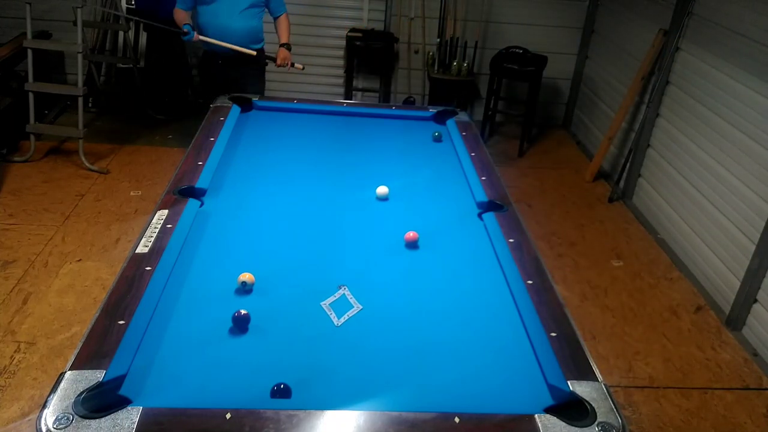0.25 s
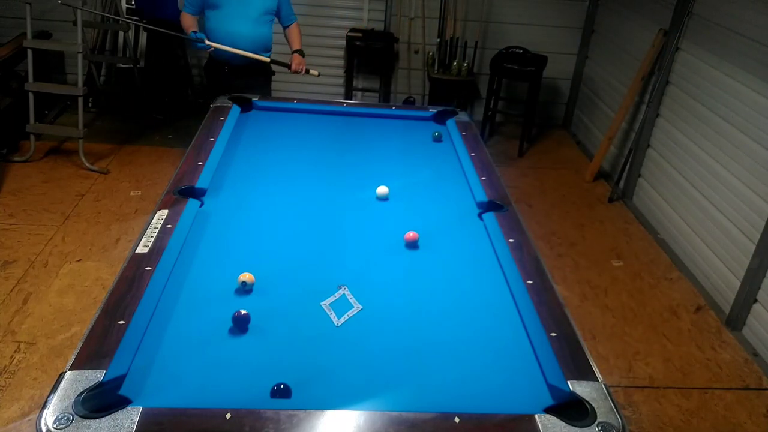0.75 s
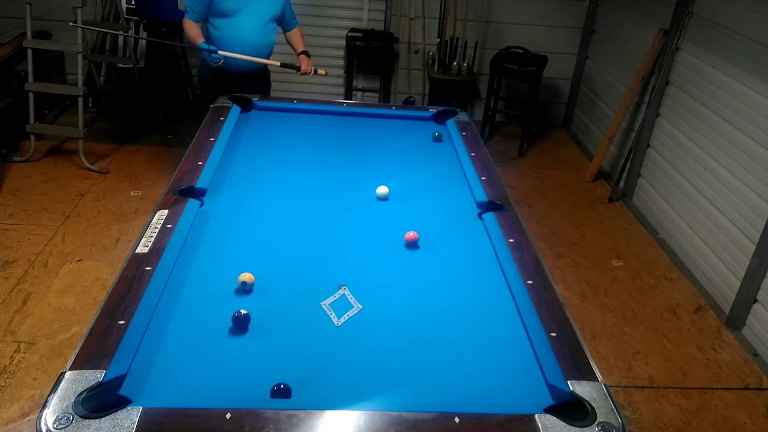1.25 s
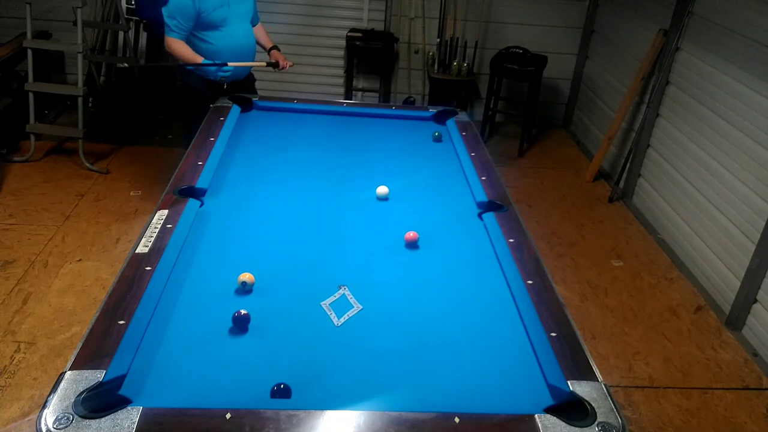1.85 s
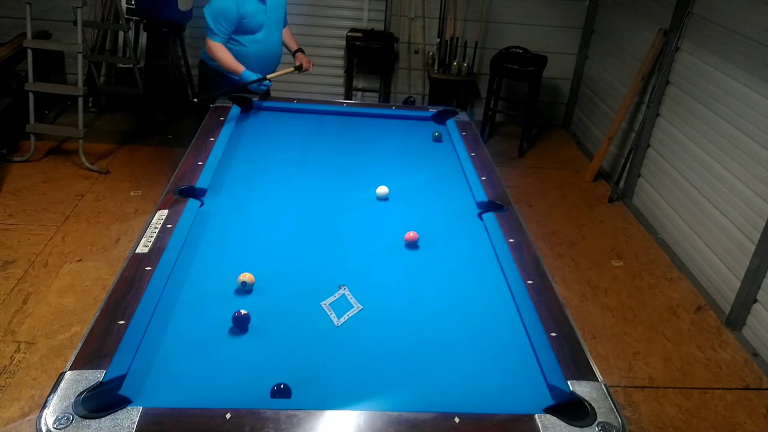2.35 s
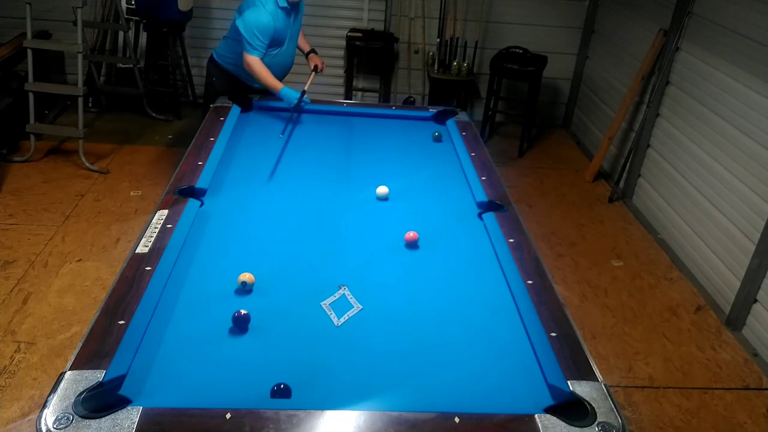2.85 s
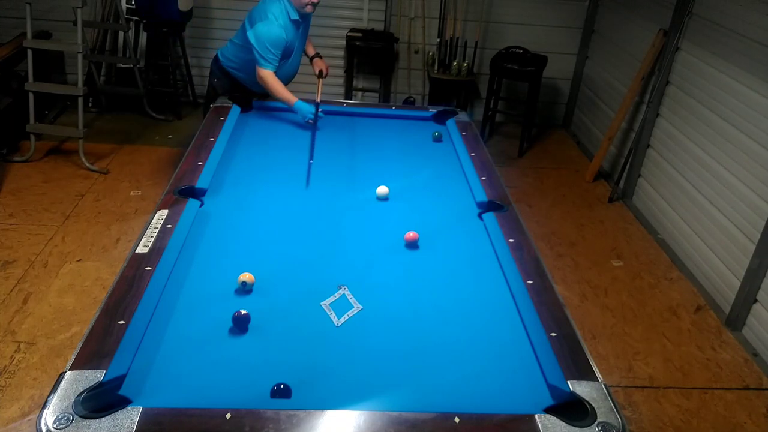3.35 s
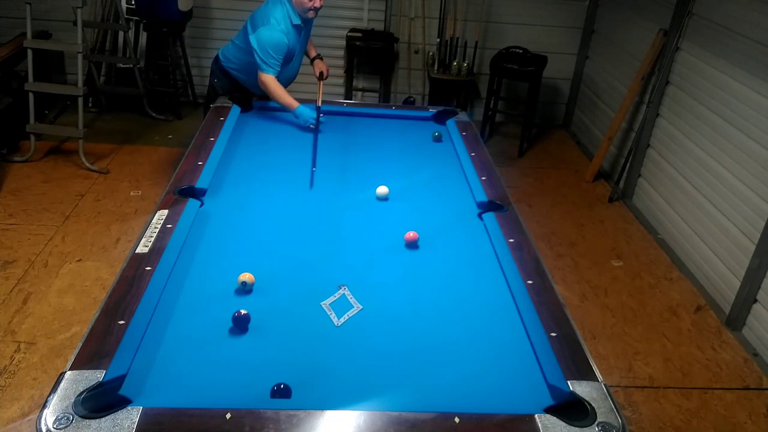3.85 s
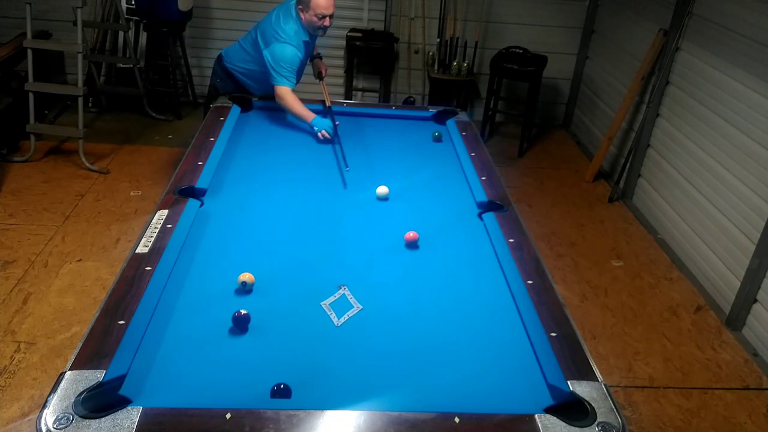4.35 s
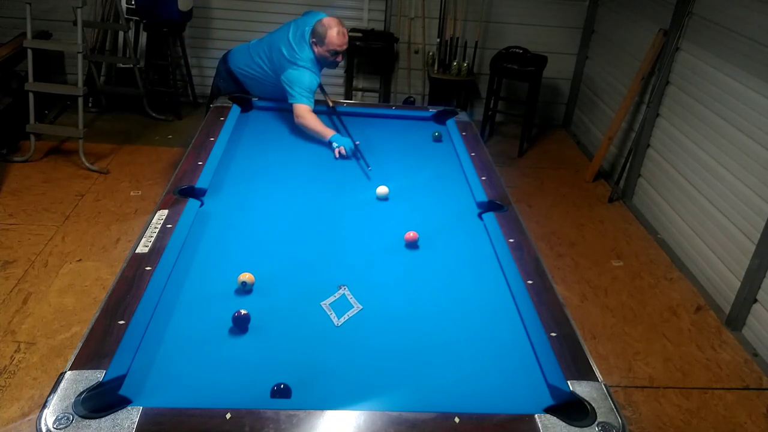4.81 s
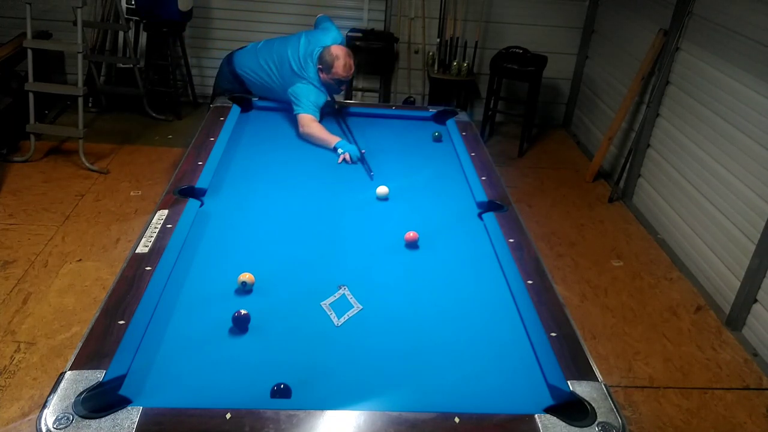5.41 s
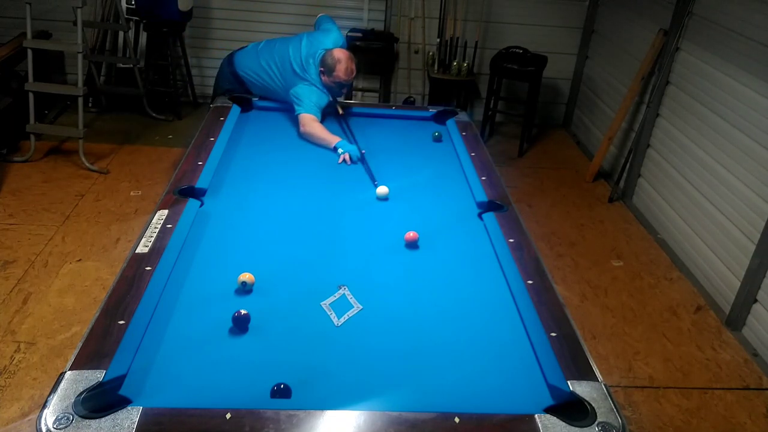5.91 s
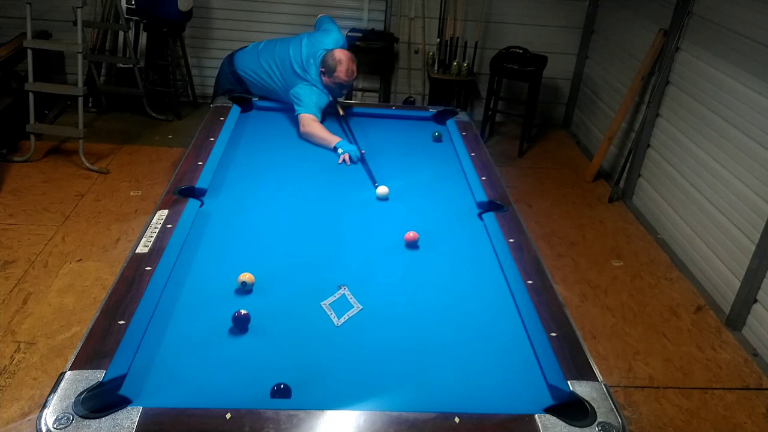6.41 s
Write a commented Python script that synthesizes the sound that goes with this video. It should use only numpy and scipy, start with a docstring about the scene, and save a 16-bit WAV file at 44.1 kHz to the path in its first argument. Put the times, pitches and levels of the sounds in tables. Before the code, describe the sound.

A pool ball knocks down into a wooden ball return, rumbles along the track and clacks against other balls, over a low hum.

```python
"""A machine hums with a slow throb in a garage as a potted pool ball knocks down into the table's
wooden ball return. The hollow cabinet booms, and the ball rumbles along its uneven track, cracks into
the tray and clacks against the balls lying there; one last thud follows. Each hit is a short pulse that
sets wood or balls ringing and echoes round the room. The player's clothes rustle, and his cue ticks
and slides over his glove as he lines up the next shot."""
import sys
import numpy as np
from scipy import signal
from scipy.fft import rfft, irfft
from scipy.io import wavfile

SR = 44100
rng = np.random.default_rng(int(sys.argv[2]) if len(sys.argv) > 2 else 0)


def dump_mix(stems):
    """Bounce the given channels to the path in sys.argv[1] as a 16-bit WAV at rate SR."""
    frames = np.atleast_2d(stems).T  # one column per channel
    limited = np.clip(frames, -1, 1)  # hard clip at full scale
    pcm = np.round(limited * 32767).astype(np.int16)
    wavfile.write(sys.argv[1], SR, pcm)


N = 294134
TIME = np.arange(N) / SR
RING_SAMPLES = 32768

# Knocks on the wooden table: the ball in the return, then one last, broader thud:
# start_s, level_db, brightness_db_per_octave, cutoff_hz, boom_hz, boom_db
KNOCKS = [(0.147, -50.5, 6.5, 1940, 1136, -50.5), (0.428, -34.5, 2, 3500, 257.3, -30.5),
          (0.457, -34.5, -4, 1492, 910, -39.5), (0.552, -22.5, 2, 4000, 400, -47),
          (0.562, -19.5, 1.5, 3500, 729, -31), (0.654, -13.5, 0, 4500, 1005, -17.5),
          (0.690, -19, 1, 1500, 262.5, -27), (0.787, -41, -1, 1550, 397.3, -33),
          (1.102, -20, 3, 1596, 741, -23), (1.132, -16.5, 0, 1084, 621, -22.5),
          (1.180, -15.5, -0.5, 3980, 166, -18.5), (1.203, -30.5, -8.5, 2470, 206.8, -10.5),
          (1.271, -19, -1.5, 1255, 416.6, -26.5), (1.312, -20.5, -1, 1317, 206.6, -12),
          (1.58, -24, -7.5, 1480, 215, -37), (1.657, -41, 0.5, 2020, 192.6, -23),
          (1.714, -23.5, -6.5, 1180, 215.4, -24), (1.790, -23, -11.5, 1020, 210, -24),
          (3.298, -50, 3.5, 2000, 204.2, -28.5), (3.432, -27, -7, 2000, 214.4, -29),
          (3.543, -18.5, 1, 1900, 442, -21.5), (3.681, -29, 6, 4000, 252.3, -18.5),
          (3.720, -23.5, -8.5, 1480, 254.5, -26), (3.946, -29.5, -2.5, 1990, 261.8, -24),
          (4.39, -24.5, 0, 7000, 407, -50)]
# The notes the cabinet rings at: pitch_hz, level_db, ring_s (time to fade by 60 dB)
CABINET_NOTES = [(210, -25, .55), (253, -27, .6), (388, -20, .42), (492, -23, .5), (525, -21, .42),
                 (624, -25, .5), (657, -22, .42), (712, -23, .38), (757, -20, .34), (813, -25, .3),
                 (1005, -18, .3), (1061, -23, .3), (1647, -21, .25), (1933, -20, .3), (2309, -20, .3)]
# The rumble of the ball's long run down the track: time_s, level_db
LONG_RUN = [(1.39, -32), (1.5, -40), (1.76, -34), (2.08, -44), (2.59, -36), (3.06, -42), (3.12, -38),
            (3.36, -43), (3.49, -36)]


def from_db(db):
    return 10 ** (np.asarray(db) / 20)


def at_hz(points, hz):
    """Reads a value off a curve drawn over pitch, with the octaves evenly spaced."""
    pitches, values = np.transpose(points)
    return np.interp(np.log(np.maximum(hz, 1)), np.log(pitches), values)


def loudness(rows):
    """A volume curve through rows of time_s, level_db."""
    return from_db(np.interp(TIME, *np.transpose(rows)))


def lumps(per_s, depth_db):
    """A volume that jumps about at random."""
    return from_db(depth_db * np.interp(TIME * per_s, np.arange(4000), rng.standard_normal(4000)))


def rubs(rows, rise_db_per_s, fall_db_per_s):
    """The volume of rubbing movements: each swells, holds and dies away."""
    power = 0
    for start_s, length_s, db in rows:
        before_s = np.maximum(start_s - TIME, 0)
        after_s = np.maximum(TIME - start_s - length_s, 0)
        power += from_db(db - rise_db_per_s * before_s - fall_db_per_s * after_s) ** 2
    return np.sqrt(power + 1e-18)


def stereo_spectrum(size):
    """The spectrum of white noise whose left and right are alike in the bass, unrelated in the treble."""
    # How alike the two sides are: pitch_hz, likeness (1 = the same)
    likeness = [(60, 0.89), (125, 0.82), (250, 0.79), (500, 0.78), (1000, 0.061), (2000, 0.048), (4000, 0),
                (16000, 0.0)]
    hz = np.fft.rfftfreq(size, 1 / SR)
    middle, side = rfft(rng.standard_normal((2, size)))
    alike = at_hz(likeness, hz)
    return hz, np.sqrt((1 + alike) / 2) * middle + np.sqrt((1 - alike) / 2) * side * [[1], [-1]]


def peak(hz, pitch_hz, width_hz):
    """How strongly something that rings at one pitch responds to each frequency."""
    return 1 / (1 + (2 * (hz - pitch_hz) / width_hz) ** 2)


def unit_level(sound):
    return sound / np.sqrt(np.mean(sound ** 2) + 1e-20)


def noise(colour, peaks=()):
    """Stereo noise with a colour (its level at each pitch) and optional ringing peaks."""
    hz, white = stereo_spectrum(N)
    lift = 1 + sum(from_db(db) * peak(hz, pitch_hz, width_hz) for pitch_hz, width_hz, db in peaks)
    return unit_level(irfft(white * from_db(at_hz(colour, hz)) * lift, N))


def garage_reverb():
    """Many reflections blur into one tail; each octave dies away at its own rate."""
    # How long the garage rings: pitch_hz, ring_s
    ring_times = [(100, 0.47), (300, 0.68), (700, 0.61), (1500, 0.24), (3000, 0.62), (6000, .42),
                  (10000, 0.47), (16000, 0.23)]
    hz, white = stereo_spectrum(RING_SAMPLES)
    t, octaves_hz = TIME[:RING_SAMPLES], 125 * 2. ** np.arange(8)
    tail = 0
    for octave_hz, only_this in zip(octaves_hz, np.eye(8)):
        band = irfft(white * at_hz(np.c_[octaves_hz, only_this], hz))
        tail += band * from_db(-60 * t / at_hz(ring_times, octave_hz))
    return tail


def contact_pulse(colour, brightness_db_per_octave, cutoff_hz=20000):
    """The push of one hit: a hard contact is brighter, a long one loses the treble above its cutoff."""
    size = 4096
    hz, index = np.fft.rfftfreq(size, 1 / SR), np.arange(size)
    db = at_hz(colour, hz) + brightness_db_per_octave * np.log2(np.clip(hz, 200, 9000) / 1000)
    spectrum = from_db(db) / np.sqrt(1 + (hz / cutoff_hz) ** 6)
    # pack the energy at the start of the pulse (minimum phase)
    one_sided = 2 * irfft(np.log(spectrum)) * (index > 0) * (index < size // 2)
    pulse = irfft(np.exp(rfft(one_sided)))[:size // 2]
    return pulse / np.sqrt(np.sum(pulse ** 2))


def hits(rows, colour, notes, direct_db, early_db, early_s, echo_db, room_db, damping_db_per_s, notes_db):
    """Each hit is heard directly, off the table and walls, and in the ringing of the thing struck."""
    out, t = np.zeros((2, N)), TIME[:RING_SAMPLES]
    room_fade = from_db(room_db - damping_db_per_s * t)
    early_fade = from_db(early_db) * np.exp(-(t / early_s) ** 2)
    for start_s, db, *hardness in rows:
        response = garage_reverb() * (room_fade + early_fade)
        for hz, note_db, ring_s in notes:
            chance_db, phase, spread = rng.standard_normal(3)
            # short waves reach left and right out of step
            offset = min(hz / 1500, 1) * spread * np.array([[1], [-1]])
            fade = from_db(notes_db + note_db + chance_db - 60 * t / ring_s)
            response += fade * np.cos(2 * np.pi * hz * t + np.pi * phase + offset)
        response[:, 0] += from_db(direct_db)
        # single wall echoes, weaker with distance, reach one side a little before the other
        for delay_s in rng.uniform(.006, .07, 8):
            arrivals = int(delay_s * SR) + rng.integers(0, 12, 2)
            response[[0, 1], arrivals] += from_db(echo_db - 150 * delay_s)
        pulse = contact_pulse(colour, *hardness)
        add(out, start_s, from_db(db) * signal.fftconvolve(response, pulse[None], axes=1))
    return out


def add(out, start_s, sound):
    """Mixes a sound in at its start time."""
    start = round(start_s * SR)
    out[:, start:start + sound.shape[1]] += sound[:, :N - start]


def machine_hum(cycle_hz=4.95, dip_s=0.055):
    """Two low tones throb against each other over a drone that repeats with each machine cycle."""
    # The two tones: pitch_hz, level_db
    low_tones = [(79.2, -5), (88.9, -1.5)]
    # The drone's colour: pitch_hz, level_db
    colour = [(25, -35.5), (40, -31.5), (55, -8.5), (70, 8), (98, -6.5), (108, -19), (122, 5.5), (150, 8.5),
              (170, 0.5), (185, -5), (200, 4), (220, -0.5), (245, -17), (330, -20), (450, -53)]
    # The slow swell of the whole hum: time_s, level_db
    swell = [(0.0, -51), (1.17, -47), (1.24, -43), (2.88, -46.5), (3.75, -41.5), (5.78, -46), (6.67, -51)]
    # The hum dips briefly: time_s, depth_db
    dips = [(1.03, 1), (6.13, 7), (6.45, 11.5)]
    tones = sum(from_db(db) * np.sqrt(2) * np.sin(2 * np.pi * (hz * TIME + rng.random()))
                for hz, db in low_tones)
    harmonics, turn = np.arange(1, 90), np.linspace(0, 1, 4096)
    waves = np.sin(2 * np.pi * (np.outer(harmonics, turn) + rng.random((len(harmonics), 1))))
    one_cycle = from_db(at_hz(colour, harmonics * cycle_hz)) @ waves
    drone = unit_level(np.interp(TIME * cycle_hz % 1, turn, one_cycle)) + from_db(-5.5) * noise(colour)
    dips_db = sum(depth_db * np.exp(-((TIME - time_s) / dip_s) ** 2) for time_s, depth_db in dips)
    hum = loudness(swell) * from_db(-dips_db) * (from_db(-1.5) * tones + from_db(0.5) * drone)
    return hum * from_db([[-0.3], [0.3]])  # slightly to the right


def garage_quiet():
    """The quiet of the garage is a faint, steady hiss over a low rumble."""
    # The hiss: pitch_hz, level_db
    hiss = [(210, -34.5), (350, 1), (466, 0.5), (1250, -11.5), (1350, -15.5), (1590, -18), (1740, -10.5),
            (1830, -10.5), (5150, -21.5), (15700, -25)]
    # The rumble: pitch_hz, level_db
    rumble = [(15, -15), (35, -10.5), (55, -1.5), (75, -5.5), (130, -13.5), (300, -29), (1000, -61)]
    return from_db(-74) * noise(hiss) + from_db(-62.5) * noise(rumble)


def clothes_rustle(resting_db=-89):
    """The player's clothes rustle when he moves, and very faintly in between."""
    # His movements: start_s, length_s, level_db
    moves = [(0.0, 0.03, -69), (0.95, 0.12, -74), (4.8, 0.08, -69.5), (5.45, 0.24, -74.5)]
    # The colour of rubbing cloth: pitch_hz, level_db
    colour = [(300, -6.5), (700, 0.5), (1150, 13.5), (1600, 6), (2600, 6), (3600, -4.5), (6500, -4),
              (9500, -7.5), (11500, -20), (16000, -16.5)]
    return (rubs(moves, rise_db_per_s=28, fall_db_per_s=28) + from_db(resting_db)) * noise(colour)


def ball_roll(peak_width_hz=1.7, peak_db=7.5, fade_db_per_s=87.5):
    """The rolling ball shakes the cabinet's notes; the uneven track makes it rumble in lumps."""
    # The ball's first short run: time_s, level_db
    first_run = [(0.0, -51), (0.19, -62.5), (0.214, -49.5), (0.41, -47.5)]
    # The ball creeps on in the tray: time_s, level_db
    tray_run = [(4.05, -54), (4.36, -61.5)]
    # The rumble's colour: pitch_hz, level_db
    colour = [(71, -29.5), (120, -10), (176, -11.5), (254, -1.5), (366, -8), (513, -13.5), (612, -10),
              (857, -31), (1540, -36), (1710, -42), (3120, -54.5), (4000, -61.5), (5200, -77.5),
              (8800, -120)]
    volume = 0
    for run in (first_run, LONG_RUN, tray_run):
        outside_run_s = abs(TIME - np.clip(TIME, run[0][0], run[-1][0]))
        volume += loudness(run) * from_db(-fade_db_per_s * outside_run_s)
    peaks = [(hz, peak_width_hz, peak_db) for hz, _, _ in CABINET_NOTES]
    return from_db(3) * volume * lumps(per_s=32.3, depth_db=1.5) * noise(colour, peaks)


def cue_ticks():
    """The cue ticks and rings lightly as it is handled."""
    # The ticks: start_s, level_db, brightness_db_per_octave
    ticks = [(0.020, -72, 2), (0.045, -76, 0.5), (1.966, -68.5, 1), (3.252, -52.5, -7.5),
             (3.285, -61.5, -6), (3.429, -67, -3.5), (4.512, -78, -0.5), (5.058, -70, -7)]
    # A tick's colour: pitch_hz, level_db
    colour = [(300, -38.5), (1000, -9.5), (1550, -1), (2300, -16), (3000, -6), (3800, -20), (5800, -14.5),
              (7000, -20), (8000, -17.5), (10500, -20), (12000, -28.5), (16000, -36)]
    # The cue's notes: pitch_hz, level_db, ring_s
    notes = [(1560, -18, .3), (2830, -17, .25), (3150, -18, .25), (4620, -16, .25), (5900, -14, .3),
             (7950, -14, .25)]
    return hits(ticks, colour, notes, direct_db=-3, early_db=-7, early_s=0.022,
                echo_db=6.5, room_db=7, damping_db_per_s=0, notes_db=6.5)


def wood_knocks():
    """The wooden table knocks as the ball drops and jolts along the return; a broader thud comes last."""
    # A knock's colour: pitch_hz, level_db
    colour = [(20, -41.5), (40, -26), (90, -19), (180, -1), (400, -2), (750, -4), (1050, -9.5), (1400, -19),
              (2000, -23.5), (2800, -35.5), (4000, -49), (7000, -49), (10000, -63.5), (16000, -79)]
    knocks = [row[:4] for row in KNOCKS] + track_jolts()
    return hits(knocks, colour, CABINET_NOTES, direct_db=15.5, early_db=-18, early_s=0.0044,
                echo_db=11.0, room_db=-4.5, damping_db_per_s=4.5, notes_db=-7.0)


def cabinet_booms(longest_ring_s=0.49, swell_s=.004):
    """The hollow cabinet booms at a pitch set by where it is struck; high booms die sooner."""
    out, t = np.zeros((2, N)), TIME[:RING_SAMPLES]
    swell = 1 - np.exp(-t / swell_s)
    for start_s, *_, boom_hz, boom_db in KNOCKS:
        ring_s = longest_ring_s * min(1, 450 / boom_hz)
        boom = swell * from_db(boom_db - 60 * t / ring_s) * np.sin(2 * np.pi * boom_hz * t)
        add(out, start_s, np.array([boom, boom]))
    return out


def ball_skids():
    """The ball skids with a rough hiss after it lands in the chute."""
    # The skids: start_s, length_s, level_db
    skids = [(1.108, 0.012, -56.5), (1.188, 0.012, -55.5), (1.315, 0.015, -60), (1.645, 0.12, -66.5)]
    # A skid's colour: pitch_hz, level_db
    colour = [(1000, -13), (2500, 15), (4000, 0.5), (6000, -1), (9000, -8.5), (11000, -18), (16000, -32)]
    volume = rubs(skids, rise_db_per_s=1498.5, fall_db_per_s=64.5)
    return volume * lumps(per_s=120, depth_db=2.2) * noise(colour)


def track_jolts(count=9, offset_db=-4, spread_db=3, brightness_db_per_octave=1.5, cutoff_hz=1300):
    """Rows of small knocks: the uneven track jolts the ball at random, harder where it rumbles louder."""
    run_s, run_db = np.transpose(LONG_RUN)
    timing, force = rng.random((count, 2)).T
    starts_s = run_s[0] + (run_s[-1] - run_s[0]) * (np.arange(count) + timing) / count
    levels_db = np.interp(starts_s, run_s, run_db) + offset_db + spread_db * (2 * force - 1)
    return [(start_s, db, brightness_db_per_octave, cutoff_hz) for start_s, db in zip(starts_s, levels_db)]


def cue_slide():
    """The cue's shaft rubs over the glove, hissing and ringing at a few pitches."""
    # The strokes: start_s, length_s, level_db
    strokes = [(2.12, 0.15, -76), (2.47, 0.22, -60), (3.33, 0.09, -72)]
    # The colour of the hiss: pitch_hz, level_db
    colour = [(530, -34), (900, -1.5), (1160, -9), (1400, -10.5), (1580, -17), (1840, -4), (2150, -22.5),
              (2460, -14), (4260, -31.5), (5470, -28.5), (6470, -33), (10400, -39.5), (15700, -43)]
    # Where the rubbed shaft rings: pitch_hz, width_hz, level_db
    shaft_peaks = [(1850, 170, -7), (5450, 380, -18), (7700, 350, -28), (10500, 800, -28)]
    hz, white = stereo_spectrum(N)
    ringing = sum(from_db(db) * unit_level(irfft(white * peak(hz, pitch_hz, width_hz), N))
                  for pitch_hz, width_hz, db in shaft_peaks)
    volume = from_db(7.5) * rubs(strokes, rise_db_per_s=110.5, fall_db_per_s=48)
    return volume * (noise(colour) + ringing)


def rim_cracks():
    """The rim rings as the ball cracks hard into the tray, and faintly with the last thud."""
    # The cracks: start_s, level_db, brightness_db_per_octave
    cracks = [(3.501, -24.5, -2), (3.510, -27, 1), (3.546, -27.5, -1), (3.684, -28.5, -6.5),
              (4.390, -45.5, -7.5)]
    # A crack's colour: pitch_hz, level_db
    colour = [(30, -49), (80, -35.5), (250, 1), (700, -5), (1500, 1.5), (2000, -9.5), (2600, -10),
              (3500, -21), (4600, -15.5), (7000, -19.5), (9500, -32.5), (13000, -42.5), (16000, -56)]
    # The rim's notes: pitch_hz, level_db, ring_s
    notes = [(1220, -22, .2), (1388, -21, .22), (1483, -18, .22), (1560, -21, .2), (2360, -23, .22)]
    # The highest treble sounds to the left: pitch_hz, left_minus_right_db
    balance = [(2000, -0.5), (4500, -0.5), (6000, -1.5), (8000, 5.5), (14000, 4)]
    sound = hits(cracks, colour, notes, direct_db=9, early_db=-2.5, early_s=.014,
                 echo_db=7.5, room_db=-2.5, damping_db_per_s=18.5, notes_db=0.5)
    balance_db = at_hz(balance, np.fft.rfftfreq(N, 1 / SR))
    return irfft(rfft(sound) * from_db(balance_db * np.array([[.5], [-.5]])), N)


def ball_clacks():
    """Ball strikes ball in the tray, and the tray rings."""
    # The clacks: start_s, level_db, brightness_db_per_octave
    clacks = [(3.913, -33, 5), (3.9225, -29, 4), (3.929, -42.5, 7), (4.190, -43.5, 6), (4.197, -43, 0),
              (4.629, -54, -1), (5.050, -61.5, 9.5), (5.471, -58.5, -4.5), (5.975, -71, -2.5)]
    # A clack's colour: pitch_hz, level_db
    colour = [(40, -65), (200, 12), (800, -15), (1150, 3.5), (1500, 10), (2200, 7), (2600, -0.5),
              (3100, -16.5), (3600, -37), (4300, -28.5), (5800, -45), (8500, -38.5), (11000, -54),
              (13500, -39), (16000, -54)]
    # The tray's notes: pitch_hz, level_db, ring_s
    notes = [(1508, -12, .26), (1873, -12, .28), (2170, -12, .18), (2355, -16, .28), (2495, -15, .28),
             (2923, -17, .28)]
    return hits(clacks, colour, notes, direct_db=12, early_db=2, early_s=0.0053,
                echo_db=3, room_db=-6.5, damping_db_per_s=8.5, notes_db=-5.5)


def scene():
    """The ball's way through the return, the player's small noises and the garage behind them."""
    striking = wood_knocks() + cabinet_booms() + ball_clacks() + rim_cracks() + cue_ticks()
    rubbing = ball_roll() + ball_skids() + clothes_rustle() + cue_slide()
    return striking + rubbing + garage_quiet() + machine_hum()


def record(dry):
    """The microphone loses the deepest bass; the highest treble is cut steeply."""
    bass_cut = signal.butter(3, 38, "high", fs=SR, output="sos")
    treble_cut = signal.ellip(12, .1, 80, 15750, fs=SR, output="sos")
    return signal.sosfilt(treble_cut, signal.sosfilt(bass_cut, dry))


dry = scene()
out = record(dry)
dump_mix(out)
```